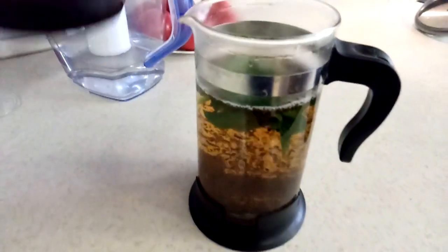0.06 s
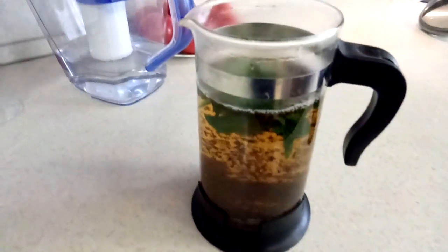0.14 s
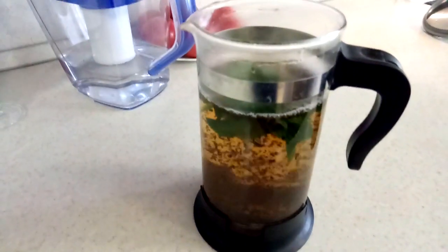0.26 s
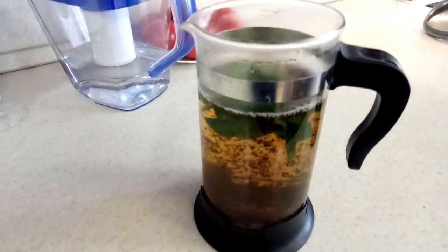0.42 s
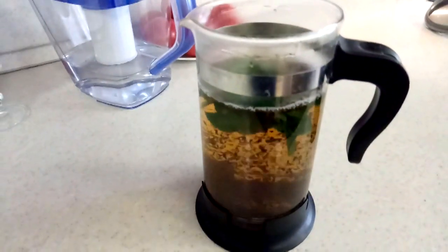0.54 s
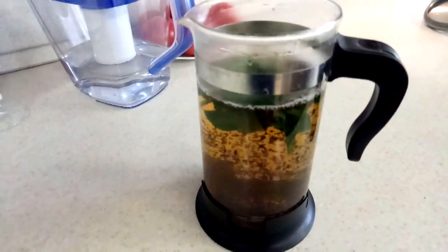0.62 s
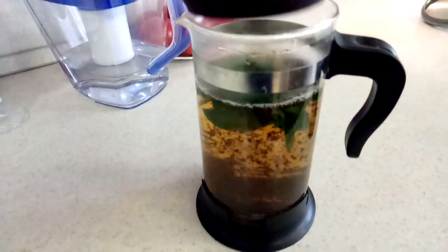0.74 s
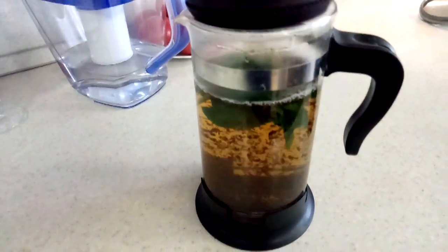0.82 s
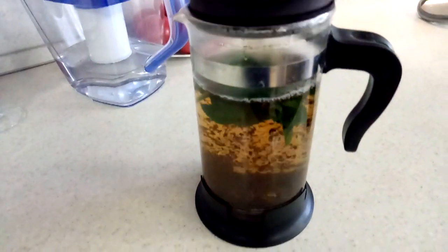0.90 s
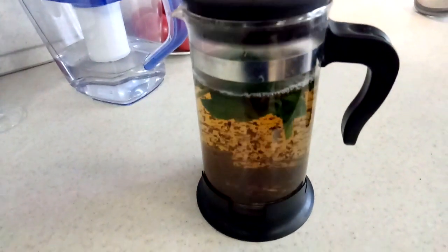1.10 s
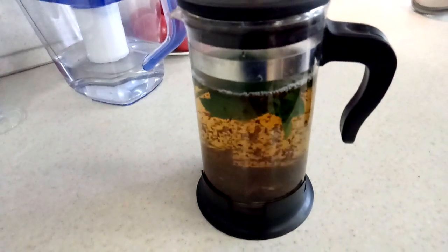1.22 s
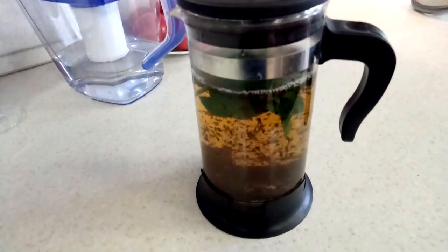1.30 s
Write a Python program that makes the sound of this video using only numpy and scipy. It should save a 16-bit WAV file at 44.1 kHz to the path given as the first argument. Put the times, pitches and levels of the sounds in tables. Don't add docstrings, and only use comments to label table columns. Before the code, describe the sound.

A lid is fitted onto a glass carafe, close up in a hard, lively kitchen. Soft sleeve rustle and low handling bumps on the right come at 0.2-0.35 s. A rim tick and knock at 0.43, plastic clack at 0.48, faint tick at 0.54. The loudest bright metal clack rattles and scuffs from 0.64 to 0.75; duller seating knocks follow at 0.84-0.88, then fading reverberation over quiet room hum.

```python
import sys
import numpy as np
from scipy import signal
from scipy.io import wavfile
from scipy.ndimage import uniform_filter1d

SR = 44100
rng = np.random.default_rng(int(sys.argv[2]) if len(sys.argv) > 2 else 0)


def boost(x):
    u = np.asarray(x, float) / 20
    return 10 ** u


def transcribe(u):
    v = np.clip(np.atleast_2d(u).T, -1, 1)
    q = np.round(v * 32767).astype(np.int16)
    wavfile.write(sys.argv[1], SR, q)


N = 59535
ROOM_PATHS = 5


def evened(x):
    return x / np.sqrt(np.mean(x ** 2) + 1e-20)


def read(points, hz):
    f, value = np.transpose(points)
    return np.interp(np.log(hz + 1), np.log(f + 1), value)


def add(mix, start_s, sound):
    part = mix[:, round(start_s * SR):][:, :sound.shape[1]]
    part += sound[:, :part.shape[1]]


def sides(left_db):
    return boost(np.array([left_db / 2, -left_db / 2]))


def bump(n, length_s):
    return np.sin(np.pi * np.clip(np.arange(n) / SR / length_s, 0, 1))


def resonate(x, hz, width_hz):
    turn = np.exp(2j * np.pi * hz * np.arange(x.shape[-1]) / SR)
    r = np.exp(-np.pi * width_hz / SR)
    for _ in range(2):
        x = 2 * (turn * signal.lfilter([1 - r], [1, -r], x / turn)).real
    return x


def pair(shape_db, size, like):
    # f/Hz, correlation
    likeness = [(60, 1), (240, 1), (950, 0.26), (3770, -0.21), (15000, -0.11)]
    frames, hz = 4 * N // size + 5, np.fft.rfftfreq(size, 1 / SR)
    a, b, c, d = rng.standard_normal((frames, len(hz), 4)).T
    same = np.clip(like * read(likeness, hz), -1, 1)[:, None]
    left, other = a + 1j * b, c + 1j * d
    z = np.array([left, same * left + np.sqrt(1 - same ** 2) * other])
    z = z * boost(shape_db(hz[:, None], np.arange(frames) * size / 4 / SR))
    return signal.istft(z, nperseg=size, noverlap=3 * size // 4)[1][:, :N]


def floor():
    # f/Hz, density/dB per Hz
    tone_db = [(30, -20), (70, -13.5), (100, -8.5), (240, -5), (630, -26), (1100, -18), (3000, -25.5),
               (6400, -24.5), (8200, -40), (16000, -70)]
    # f/Hz, left-right/dB
    tone_left_db = [(60, 2.5), (240, 1), (950, 5.5), (3770, 9.5), (15000, -4)]
    # f/Hz, width/Hz, level/dB
    appliances = [(947, 64, -74.5), (10120, 2100, -74), (15400, 870, -75)]

    def shape(hz, t_s):
        half = np.array([0.5, -0.5])[:, None, None]
        return read(tone_db, hz) + half * read(tone_left_db, hz) + 0 * t_s

    tone = pair(shape, size=1024, like=0.81)
    bands = np.zeros((2, N))
    for hz, width_hz, db in appliances:
        bands += boost(db) * evened(resonate(rng.standard_normal((2, N)), hz, width_hz))
    return boost(-61) * evened(tone) + bands * sides(3.5)[:, None]


def sleeve():
    # f/Hz, density/dB per Hz
    cloth_db = [(290, -26), (500, -2), (843, -6.5), (1300, -14), (2130, -2), (2730, -8), (3500, 0.5),
                (7500, -10.5), (11000, -8.5), (15000, -8.5)]
    # t/s, level/dB
    arm = [(0, -72.5), (.1, -66), (.19, -57.5), (.3, -59.5), (.43, -57.5), (.56, -65.5), (.66, -59.5),
           (.96, -66.5), (1.06, -60.5), (1.2, -74.5)]
    left_db = 9
    flicker_db = 1.23 * evened(uniform_filter1d(rng.standard_normal(N), 300))
    hiss = evened(pair(lambda hz, t_s: read(cloth_db, hz) + 0 * t_s, size=256, like=1.0))
    move_db = np.interp(np.arange(N) / SR, *np.transpose(arm))
    return hiss * boost(move_db + flicker_db) * sides(left_db)[:, None]


def thumps():
    # t/s, length/s, level/dB, f/Hz, left-right/dB
    pushes = [(.002, 0.043, -53.5, 179, 6), (.245, 0.066, -56, 95, -18), (.375, .05, -55, 110, -5.5),
              (0.384, 0.069, -51.5, 222, 3.5), (0.414, 0.039, -47, 122, -30), (0.673, 0.071, -52, 58.3, 0),
              (.676, 0.032, -44, 290, 3), (0.754, 0.075, -56, 62.4, -1), (0.847, 0.021, -45, 330, -9),
              (0.866, 0.054, -52, 102, 0.5), (0.987, 0.057, -56, 55, 4), (1.031, 0.14, -60.5, 280, 0.5),
              (1.218, 0.038, -58, 249, 8), (1.237, 0.077, -67, 1010, 4), (1.33, 0.013, -61, 200, 12)]
    q = 2.9
    out = np.zeros((2, N))
    for start_s, length_s, db, hz, left_db in pushes:
        lump = evened(resonate(rng.standard_normal(8000), hz, hz / q)[2000:])
        push = bump(6000, length_s)
        lumpy = lump * push
        lumpy = lumpy / np.sqrt(np.mean(lumpy ** 2) / np.mean(push ** 2))
        gains = boost(np.minimum([left_db, -left_db], 0))
        add(out, start_s, boost(db) * np.outer(gains, lumpy))
    return out


def scuffs():
    # t/s, length/s, level/dB, f/Hz
    rubs = [(.637, 0.011, -45.5, 2310), (.644, 0.0078, -39.5, 2860), (.638, 0.0123, -41.5, 780),
            (.647, 0.0075, -38.5, 295), (.643, 0.012, -50.5, 6000), (.640, 0.0063, -54, 1670),
            (.652, 0.0079, -63, 2400), (.770, 0.0098, -47.5, 5860), (.770, 0.0097, -51, 10800),
            (.186, 0.01, -69, 4700), (1.1, 0.0062, -60, 2800), (.433, 0.0054, -45, 3100),
            (.843, .005, -49, 2140), (.843, .005, -48.5, 3220), (0.88, .006, -48.5, 5850)]
    q, grains_per_s = 2.8, 8000
    out = np.zeros((2, N))
    for start_s, length_s, db, hz in rubs:
        grains = rng.standard_normal((2000, 2)).T * (rng.random(2000) < grains_per_s / SR)
        add(out, start_s, boost(db) * bump(2000, length_s) * evened(resonate(grains, hz, hz / q)))
    return out


def fingers():
    # t/s, length/s, peak/dB, f/Hz
    presses = [(.190, 0.015, -31, 92), (0.2, 0.013, -30.5, 178), (.201, .012, -34.5, 404),
               (0.2, 0.021, -29.5, 121), (.222, 0.013, -36.5, 136), (0.32, 0.025, -30.5, 82),
               (.336, 0.013, -35.5, 188), (.342, 0.019, -38.5, 106), (.337, 0.011, -44, 355),
               (0.27, 0.013, -42, 278)]
    left_db = -30
    out, t_s = np.zeros((2, N)), np.arange(2000) / SR
    for start_s, length_s, db, hz in presses:
        press = bump(2000, length_s) ** 2 * np.sin(2 * np.pi * hz * t_s)
        add(out, start_s, boost(db) * np.outer([boost(left_db), 1], press))
    return out


def strike(modes, hits, lag_s, wet_db):
    rise_cycles, detune, broad_hz = 0.94, 0.012, 480
    slip_odds, slip_share = 0.08, 0.3
    crack_t60_s, crack_rise_s = 0.042, 0.0003
    t_s, out = np.arange(SR // 6) / SR, np.zeros((2 + ROOM_PATHS, N))
    since = np.maximum(t_s - np.array([[lag_s], [0], [0]]), 0)
    band = signal.butter(1, [1360, 7400], "bandpass", fs=SR)
    for path, (start_s, db, contact_ms, crack_db) in enumerate(hits):
        ring = 0
        tunes = 1 + detune * rng.uniform(-0.87, 1, len(modes))
        for (hz, mode_db, t60_s, left_db), tune in zip(modes, tunes):
            damp = np.array([[1], [1], [1 + hz / broad_hz]])
            push = np.append(sides(left_db), 1)[:, None] * np.sqrt(damp) / (1 + (hz * contact_ms / 1000) ** 2)
            rise = 1 - np.exp(-since * damp * hz / rise_cycles)
            decay = boost(mode_db - 60 * since * damp / t60_s)
            ring = ring + push * rise * decay * np.sin(2 * np.pi * hz * tune * since)
        later_slips = rng.uniform(-slip_share, slip_share, 30) * (rng.random(30) < slip_odds)
        slips = np.append(1, later_slips)
        noise = signal.lfilter(*band, signal.lfilter(*band, rng.standard_normal(since.shape)))
        crack_decay = boost(db + crack_db - 60 * since / crack_t60_s)
        crack = crack_decay * np.minimum(since / crack_rise_s, 1) * noise
        add(out[:2], start_s, boost(db) * signal.lfilter(slips, [1], ring[:2]) + crack[:2])
        to_room = boost(wet_db) * (boost(db) * ring[2:] + crack[2:])
        add(out[2 + path % ROOM_PATHS:][:1], start_s, to_room)
    return out


def rim_knocks():
    # f/Hz, level/dB, t60/s, left-right/dB
    modes = [(280, -1.5, 0.024, 0), (548, -10.5, 0.045, 2), (1235, -7.5, 0.015, 18), (1565, 4, 0.012, 6),
             (1990, -1.5, 0.014, 6), (2600, 0, 0.021, 5), (3120, 10, 0.0079, 8), (3770, -19.5, 0.019, 37)]
    # t/s, peak/dB, contact/ms, crack/dB
    hits = [
        (.4340, -35, 0.043, -21),
        (0.4338, -28.5, 0.68, -20),
        (0.4368, -21.5, 1, -32),
        (0.5433, -38.5, 0.33, -11),
    ]
    return strike(modes, hits, lag_s=0.00019, wet_db=-23.5)


def shell_clacks():
    # f/Hz, level/dB, t60/s, left-right/dB
    modes = [(208, 1, 0.05, -2), (311, 2, 0.045, 0), (553, 3.5, 0.031, -1.5), (748, 11.5, 0.018, 3),
             (931, -1.5, 0.026, 18), (1600, -14, 0.0091, -32), (2310, -12.5, 0.032, 17.5),
             (3310, -11, 0.022, 15.5), (6000, -24, 0.012, 3)]
    # t/s, peak/dB, contact/ms, crack/dB
    hits = [
        (.4782, -23, 0.33, -11.5),
        (0.4829, -28, 2.7, -18),
        (0.4904, -31.5, 1.6, -10),
    ]
    return strike(modes, hits, lag_s=0.00041, wet_db=-23)


def metal_clacks():
    # f/Hz, level/dB, t60/s, left-right/dB
    modes = [(247.5, -10.5, 0.062, -2.5), (349.3, -16, 0.054, -2), (813, -20, 0.039, -19),
             (970, -5.5, 0.027, 12.5), (1239, -4, 0.022, 15), (1385, -3, 0.014, 10), (2315, -3.5, 0.029, 0),
             (3060, -3.5, 0.021, 12.5), (4330, -2.5, 0.014, -1), (5950, -11, 0.018, 10),
             (7300, -31, 0.0086, 3), (10110, -7, 0.016, -5), (11930, -16, 0.0089, 1),
             (14500, -12, 0.023, 6)]
    # t/s, peak/dB, contact/ms, crack/dB
    hits = [
        (0.6637, -23, .03, 2),
        (.6655, -14, .4, -14.5),
        (0.6676, -25.5, 0.075, -6.5),
        (.6718, -24, 0.35, -7),
        (0.6773, -28.5, .4, -6),
        (.6850, -30, .2, 0),
        (.712, -30.5, 0.59, -5),
        (0.7222, -34, 0.54, -4),
        (.748, -35, 0.59, -6.5),
    ]
    return strike(modes, hits, lag_s=0.000432, wet_db=-21)


def seating():
    # f/Hz, level/dB, t60/s, left-right/dB
    modes = [(263, -18, 0.069, 1), (472, -9, .025, 3), (727, 4.5, 0.013, 2.5), (1564, -4, .013, 1),
             (2300, -16.5, .015, 13), (2920, -5.5, .012, 11.5), (4470, -28, 0.0098, 0)]
    # t/s, peak/dB, contact/ms, crack/dB
    hits = [
        (.8437, -21.5, 0.59, -21),
        (0.8475, -32.5, 0.95, -37),
        (.8614, -30.5, 0.53, -34),
        (.8628, -25, 0.29, -28),
        (.8642, -25.5, 0.28, -23),
        (.8656, -26, 0.37, -13.5),
        (0.8711, -33.5, 1.2, -36),
        (.8780, -29, 1.3, -39),
    ]
    return strike(modes, hits, lag_s=0.00018, wet_db=-20.5)


def kitchen(x):
    # f/Hz, t60/s
    tail_t60_s = [(60, 0.31), (250, 1), (600, 0.57), (1200, 0.74), (3000, 0.69), (7000, 0.49),
                  (15000, 0.16)]
    # f/Hz, level/dB
    tail_db = [(60, -30), (250, -8), (600, -17), (1200, -10), (3000, -9.5), (7000, -12), (15000, -4.5)]
    early_db, early_t60_s = 13, 0.044
    gap_s, left_db = 0.004, 4

    def shape(hz, t_s):
        late = boost(-60 * t_s / read(tail_t60_s, hz))
        early = boost(early_db - 60 * t_s / early_t60_s)
        return read(tail_db, hz) + 20 * np.log10(late + early)

    tail = pair(shape, size=256, like=0.97)
    tail = tail * np.clip(np.arange(N) / SR / gap_s - 1, 0, 1) * 0.44
    x = signal.sosfilt(signal.butter(2, 110, "highpass", fs=SR, output="sos"), x)
    return signal.fftconvolve(x[None], tail * sides(left_db)[:, None], axes=1)[:, :N] / 10


def scene():
    lid = rim_knocks() + shell_clacks() + metal_clacks() + seating()
    rub = scuffs()
    add(lid[-1:], 0, boost(-20) * rub[:1])
    room = sum(kitchen(path) for path in lid[2:])
    return lid[:2] + rub + room + thumps() + fingers() + sleeve() + floor()


def top_cut(x):
    return signal.sosfilt(signal.butter(12, 16520, fs=SR, output="sos"), x)


def record(dry):
    shelf_hz, shelf_db, edge_hz = 15600, -22, 16050
    corners_hz = [0, shelf_hz - 150, shelf_hz + 150, edge_hz, edge_hz + 150, SR / 2]
    gains = [1, 1, boost(shelf_db), boost(shelf_db), 0, 0]
    top = signal.firwin2(511, corners_hz, gains, window=("kaiser", 8), fs=SR)
    cut = signal.sosfilt(signal.butter(2, 42, "highpass", fs=SR, output="sos"), dry)
    return top_cut(signal.oaconvolve(cut, top[None], "same"))


dry = scene()
out = record(dry)
transcribe(out)
```